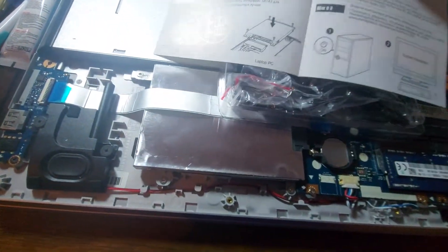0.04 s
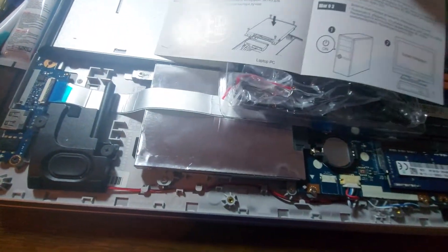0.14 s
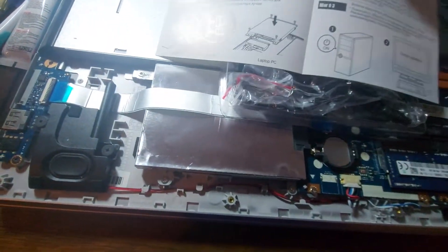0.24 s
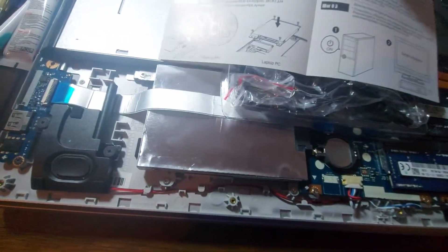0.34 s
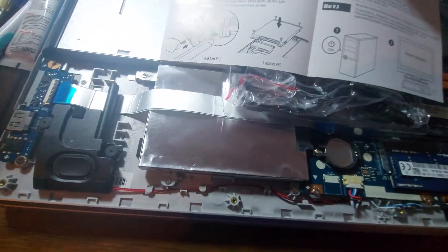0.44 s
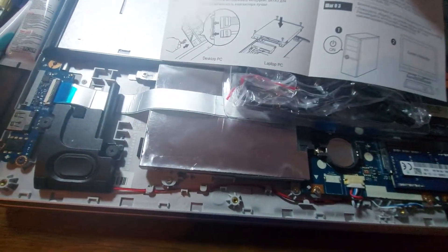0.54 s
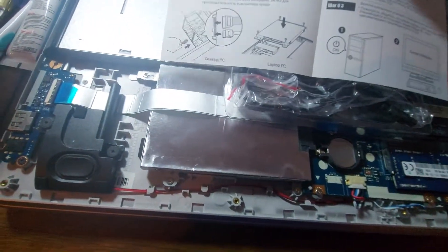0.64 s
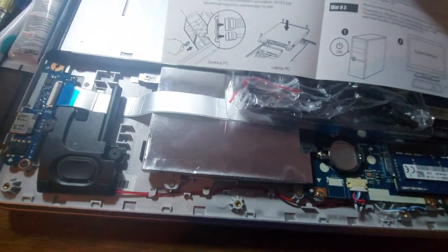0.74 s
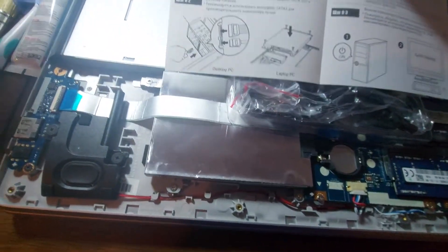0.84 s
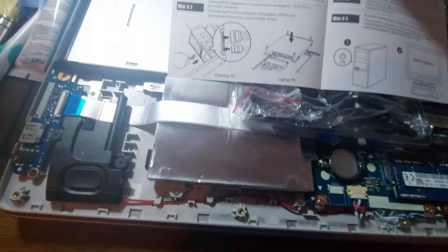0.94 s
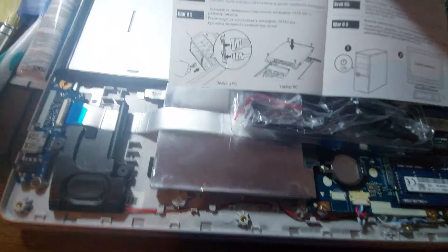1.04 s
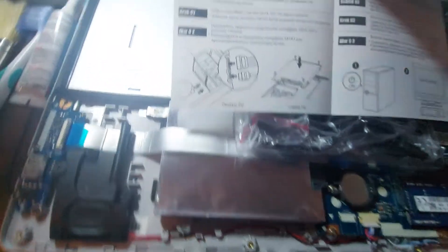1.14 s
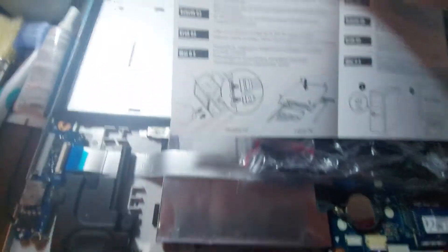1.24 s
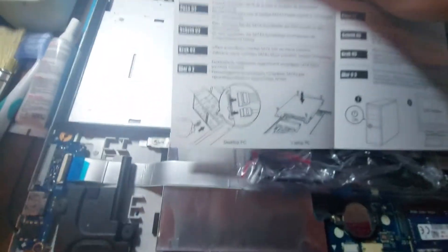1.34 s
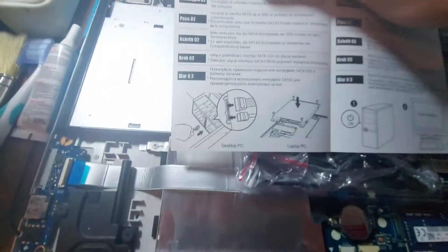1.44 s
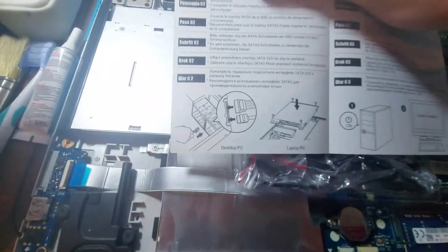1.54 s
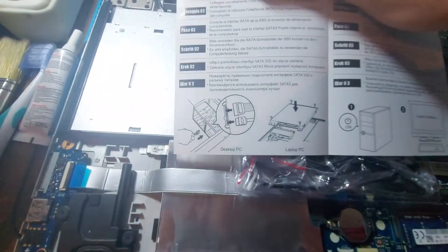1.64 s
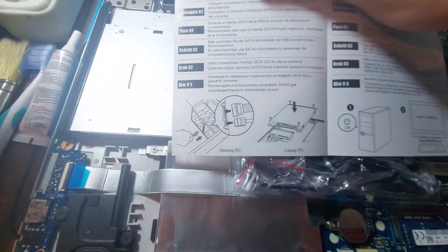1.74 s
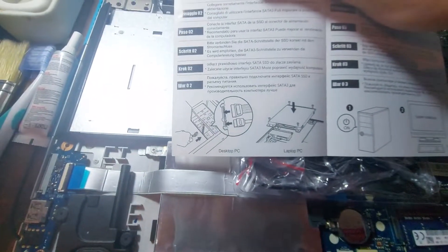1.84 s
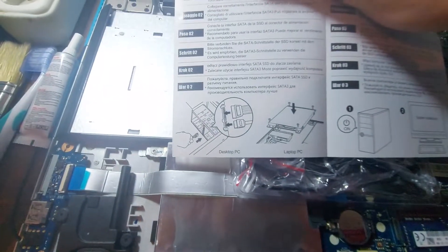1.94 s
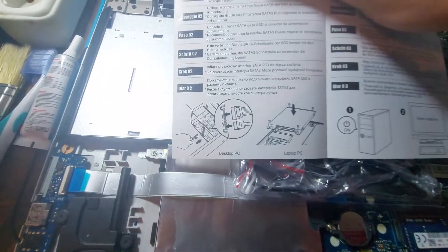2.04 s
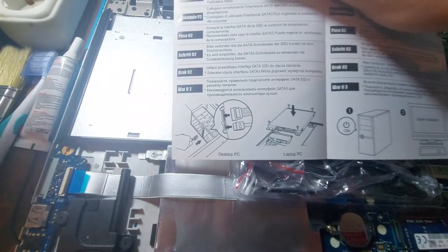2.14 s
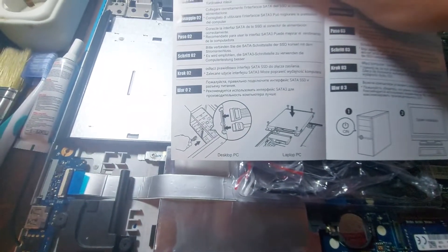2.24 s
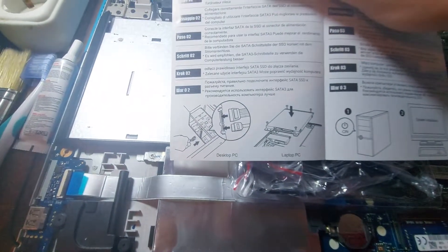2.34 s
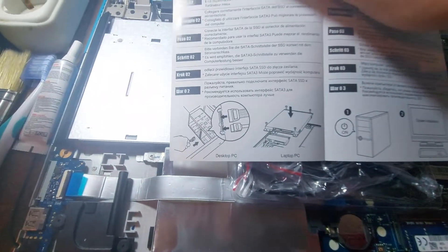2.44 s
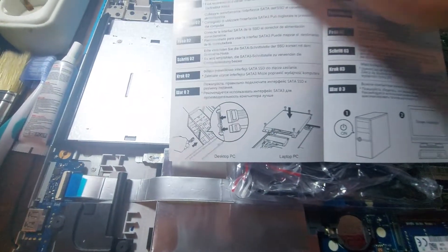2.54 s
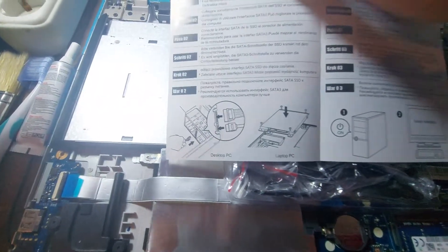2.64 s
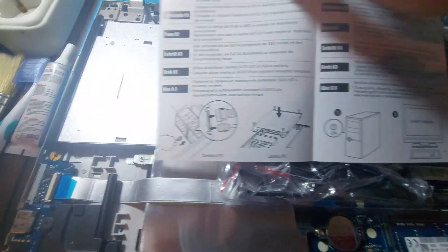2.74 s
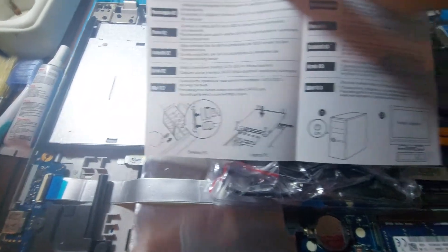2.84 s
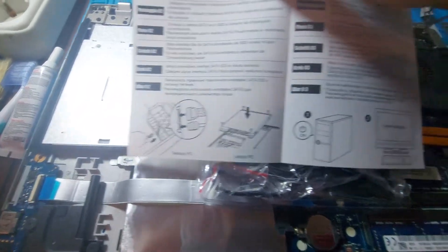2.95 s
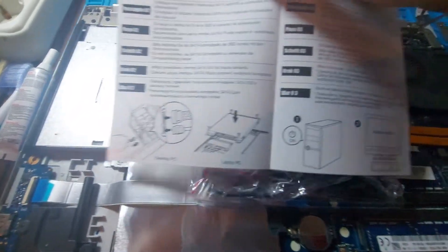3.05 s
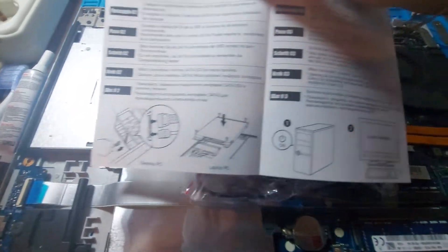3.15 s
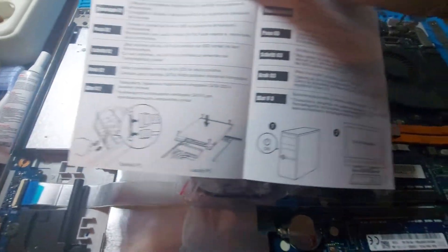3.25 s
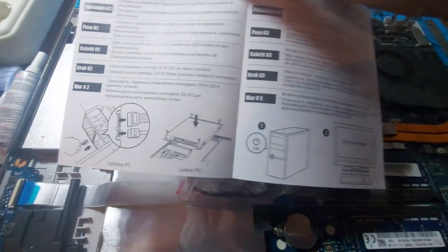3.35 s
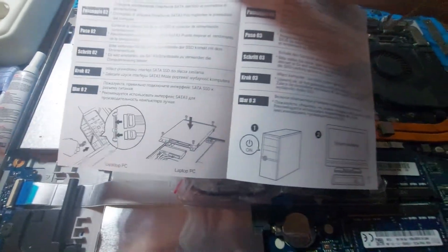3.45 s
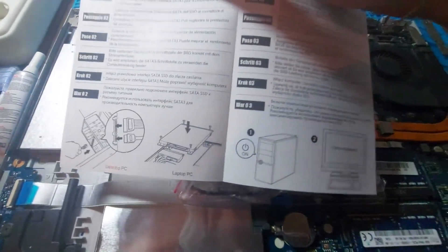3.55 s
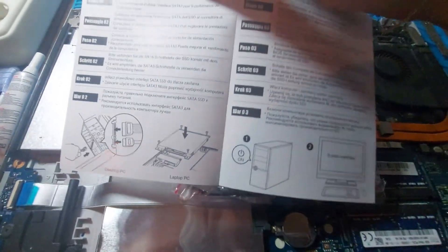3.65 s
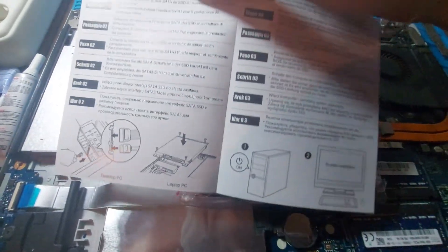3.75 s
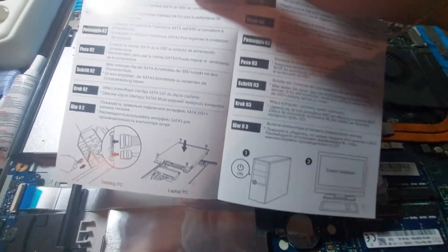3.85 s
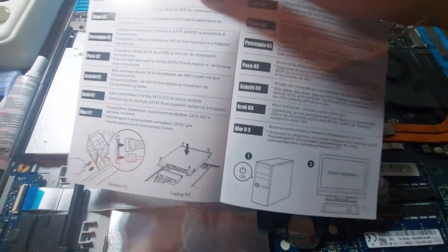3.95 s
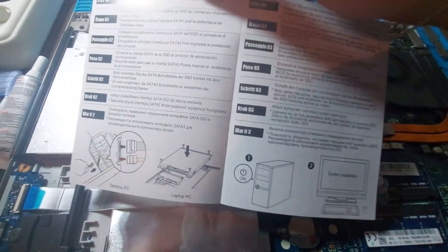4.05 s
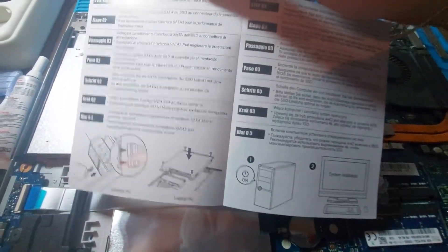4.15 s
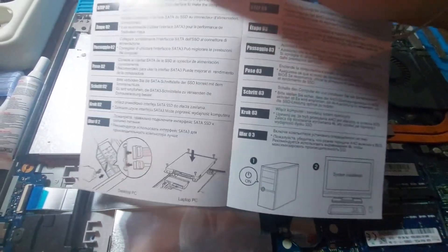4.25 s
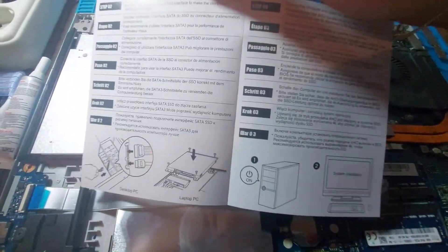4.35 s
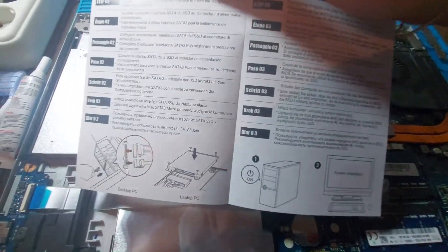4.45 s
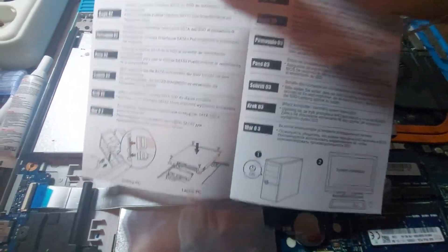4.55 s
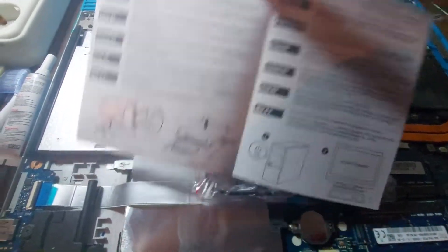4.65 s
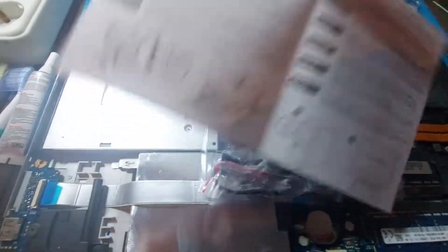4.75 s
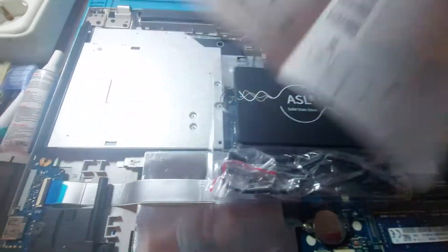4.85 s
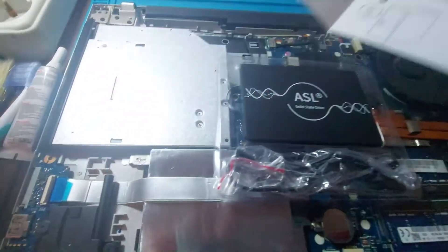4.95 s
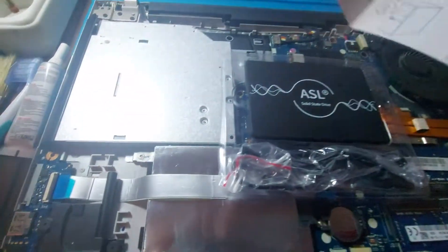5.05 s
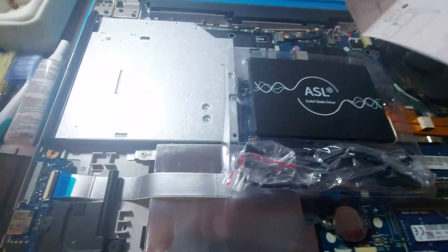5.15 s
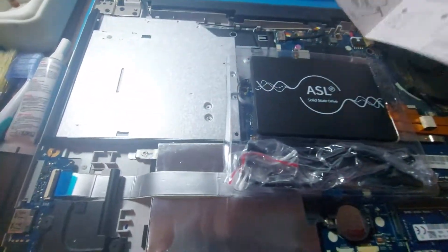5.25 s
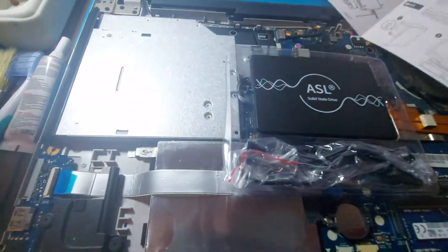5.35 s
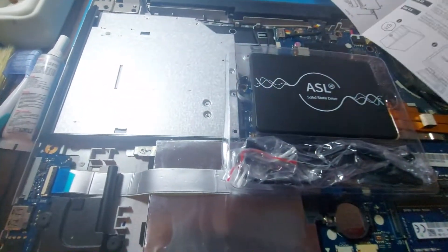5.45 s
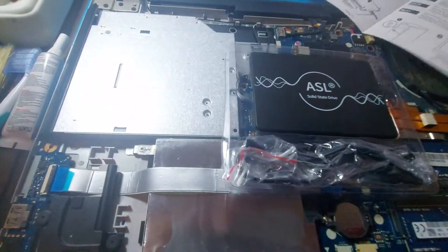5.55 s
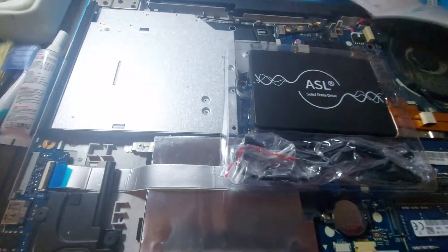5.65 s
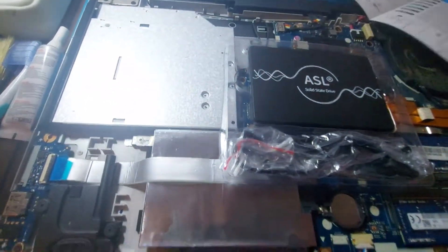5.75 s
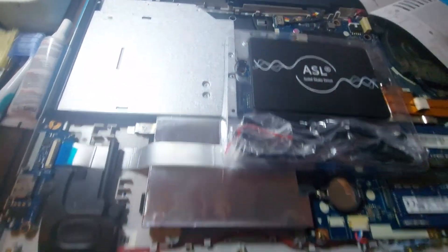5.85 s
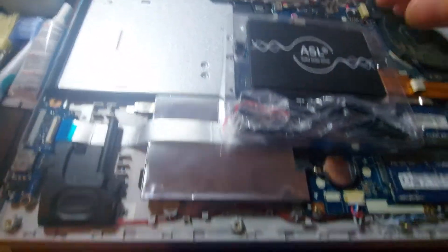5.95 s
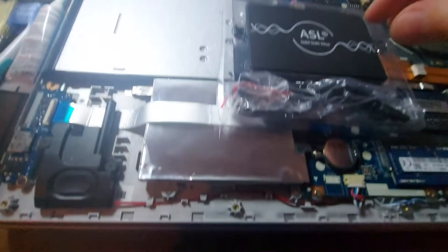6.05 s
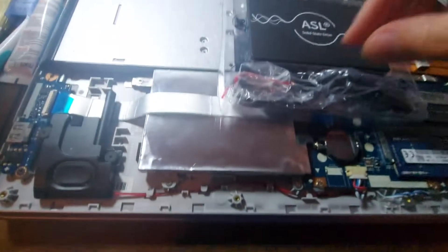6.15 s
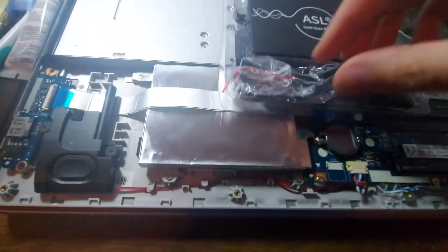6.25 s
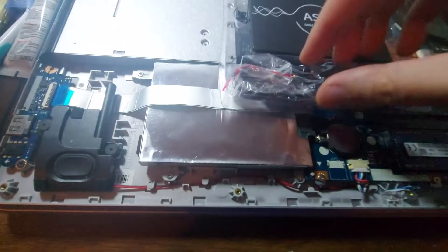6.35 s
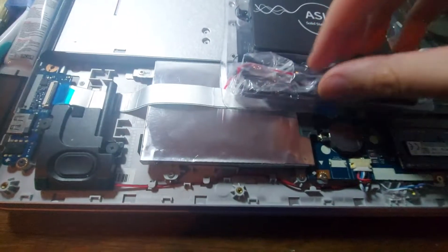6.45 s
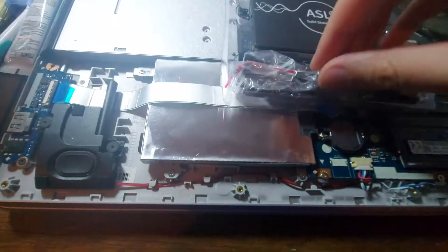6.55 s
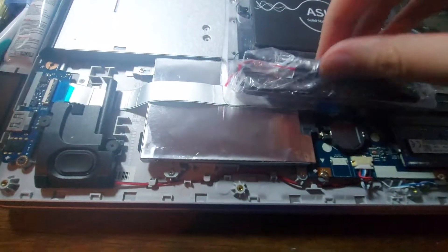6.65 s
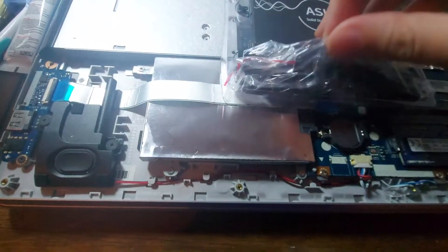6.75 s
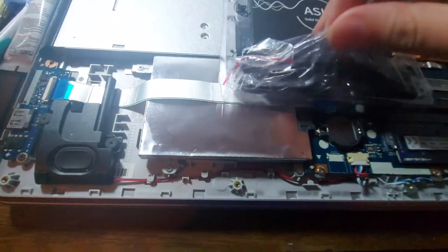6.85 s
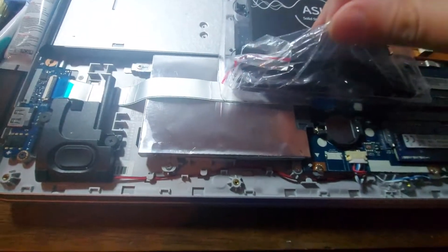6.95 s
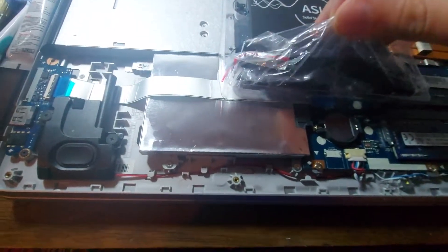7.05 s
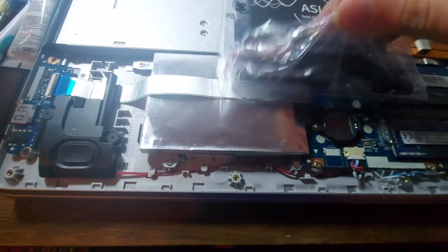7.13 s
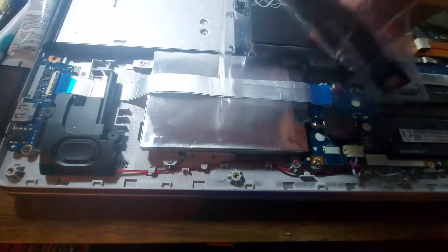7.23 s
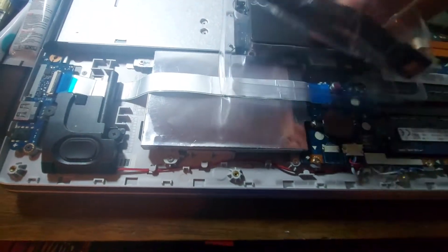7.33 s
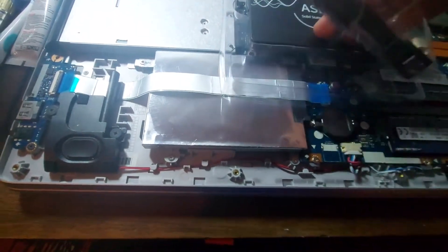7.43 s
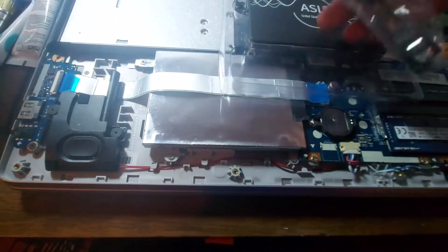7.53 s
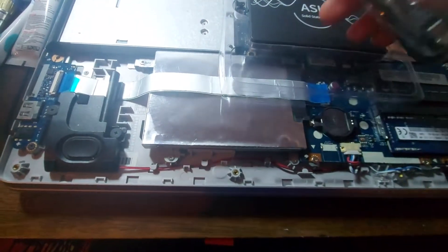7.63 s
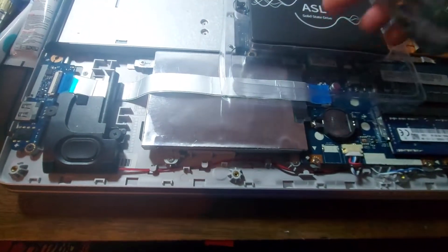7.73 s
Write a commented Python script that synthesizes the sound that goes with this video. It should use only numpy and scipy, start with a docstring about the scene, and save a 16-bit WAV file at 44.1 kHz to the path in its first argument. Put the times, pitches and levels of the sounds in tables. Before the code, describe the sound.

A paper leaflet gives a brief scrape and rustle at the start, close to the microphone, then only faint sliding and a few small ticks. At about 2.8 seconds it flutters and pops softly, and it hisses lightly through the fingers until around 4.3 seconds. From 4.6 to 5.7 seconds the leaflet is swung aside, flapping, scraping and buckling with louder, dull, hollow pops, the strongest near 5.3 seconds. After a little more soft sliding, a thin plastic bag starts crinkling at about 6.5 seconds. Bright snaps and dense bursts of tiny crackles are strongest from 6.7 to 7.3 seconds, with a soft bump against a laptop case near 7.2 seconds. A few lighter crinkles follow until about 7.8 seconds. A faint room hum and low rumble lie underneath throughout.

```python
"""A paper leaflet and a plastic bag

Hands hold a leaflet over an open laptop on a desk, swing it aside, then pick up a thin plastic bag.
The leaflet slides, flutters and buckles with dull pops. The bag crinkles as its creases give way,
in bright snaps and dense bursts of tiny ones. A quiet room hums behind.
The stereo microphone is close, and its left opening sounds hollow."""
import sys
import numpy as np
from scipy import signal
from scipy.fft import rfft, irfft, next_fast_len
from scipy.io import wavfile

SR = 44100
rng = np.random.default_rng(int(sys.argv[2]) if len(sys.argv) > 2 else 0)


def to_wav(sig):
    """Store sig (one row per channel, or 1-D mono) as 16-bit WAV at the path in sys.argv[1].

    Samples outside -1..1 are clipped; the rate is SR.
    """
    pcm = np.clip(np.atleast_2d(sig), -1, 1) * 32767
    pcm = np.round(pcm).astype(np.int16)
    wavfile.write(sys.argv[1], SR, pcm.T)  # frames by channels


N = 343539
TIME = np.arange(N) / SR
FFT_SIZE = next_fast_len(N + SR // 2)
HZ = np.maximum(np.arange(FFT_SIZE // 2 + 1) * SR / FFT_SIZE, 1)
SIDES = np.array([[1], [-1]])   # left, right; a "balance" below is left level minus right level


def from_db(db):
    """Turn decibels into a gain to multiply by."""
    return 10 ** (np.asarray(db) / 20)


def unit_power(x):
    """Scale to an average power of 1."""
    return x / np.sqrt(np.mean(x ** 2) + 1e-20)


def unit_energy(x):
    """Scale a short stereo sound to an average energy of 1 a side."""
    return x / np.sqrt(np.sum(x ** 2) / 2)


def curve(points):
    """Join rows of (f/Hz, level/dB) into a gain for every frequency."""
    hz, db = np.transpose(points)
    return from_db(np.interp(np.log(HZ), np.log(hz), db))


def band(points, low_hz, high_hz):
    """One stretch of a tone curve, falling steeply at both ends."""
    return unit_power(curve(points) / np.sqrt((1 + (low_hz / HZ) ** 8) * (1 + (HZ / high_hz) ** 8)))


def colour(x, gain, balance):
    """Filter a sound and share each frequency between left and right."""
    ratio = curve(balance)
    gains = gain * np.sqrt(2 / (1 + ratio ** 2)) * np.stack([ratio, np.ones_like(ratio)])
    # minimum phase: the filter rings after a click, never before it
    cepstrum = irfft(np.log(gains + 1e-5), FFT_SIZE)
    cepstrum[:, 1:FFT_SIZE // 2] *= 2
    cepstrum[:, FFT_SIZE // 2 + 1:] = 0
    return irfft(rfft(x, FFT_SIZE) * np.exp(rfft(cepstrum)), FFT_SIZE)[:, :N]


# How much the two sides differ, against what they share: f/Hz, level/dB
STEREO_WIDTH = [(60, -16), (250, -12.5), (600, -4.5), (1200, -1.5), (2500, 1), (6000, 0), (14000, 2)]


def widen(pair, lag_s=.0001):
    """Two unrelated signals become stereo: alike in the bass, apart in the treble, the left late."""
    mid, side = rfft(pair, FFT_SIZE)
    width = curve(STEREO_WIDTH)
    delay = np.exp(-2j * np.pi * HZ * lag_s * (SIDES > 0))
    return irfft(delay * (mid + SIDES * width * side) / np.sqrt(1 + width ** 2), FFT_SIZE)[:, :N]


def pan(balance_db):
    """Left and right gains that keep the total power."""
    return unit_power(from_db(SIDES * balance_db / 2))


def drift(turns_per_s):
    """A random wander with a typical size of 1."""
    points = rng.standard_normal(4000)
    return unit_power(np.interp(TIME * turns_per_s, np.arange(len(points)), points))


def add(out, start_s, sound):
    """Mix a short sound in at a given time."""
    i = int(start_s * SR)
    out[:, i:i + sound.shape[1]] += sound[:, :N - i]


def ring(x, hz, width_hz):
    """Make a sound ring at one pitch; a narrower width rings longer."""
    r = np.exp(-np.pi * width_hz / SR)
    feed = np.sqrt((1 - r * r) / 2) * np.array([1, 0, -1])
    feedback = [1, -2 * r * np.cos(2 * np.pi * hz / SR), r * r]
    return signal.lfilter(feed, feedback, x + 1e-18)


def crack(scatter_s, scatter_db, desk_s, desk_db, spread):
    """A click, its quick scatter across the sheet and its reflections from desk and laptop."""
    t = np.arange(SR // 25) / SR
    noise = rng.standard_normal((2, 2, len(t)))
    out = np.zeros((2, len(t)))
    out[0, 3] = out[1, 0] = rng.choice([-1, 1])   # the left side hears it a little later
    for (mid, side), decay_s, db in zip(noise, (scatter_s, desk_s), (scatter_db, desk_db)):
        out += from_db(db) * (mid + spread * SIDES * side) * np.exp(-t / decay_s) / np.sqrt(decay_s * SR)
    return unit_energy(out)


def grains(low_hz, high_hz, per_s, cycles, size_db, clump_db, clump_rate, rub_db, count=18):
    """Tiny slips of uneven size, ringing at many pitches, come in clumps over a smooth rub."""
    happens = rng.random(N) < per_s / SR
    sizes = from_db(size_db * np.minimum(rng.exponential(1, N), 3.5))
    slips = happens * sizes * rng.standard_normal((2, N))
    choice = rng.integers(0, count, N)
    pitches = np.minimum(np.geomspace(low_hz, high_hz, count), .4 * SR)
    rings = sum(np.sqrt(hz) * ring(slips * (choice == k), hz, hz / cycles)
                for k, hz in enumerate(pitches))
    rub = from_db(rub_db) * rng.standard_normal((2, N))
    clumps = from_db(clump_db * drift(clump_rate))
    return unit_power(widen((unit_power(rings) + rub) * clumps))


def hand_moves(rows, rise_s, fades_s):
    """Each move swells, holds and dies away; gives one gain over time for each level column."""
    t = np.arange(0, N, 16) / SR
    gains = []
    for layer, fade_s in enumerate(fades_s):
        power = np.zeros(len(t))
        for start, hold, *levels_db in rows:
            rise = np.exp(-(np.minimum(t - start, 0) / rise_s) ** 2)
            fade = np.exp(-np.maximum(t - start - hold, 0) / fade_s)
            power += (from_db(levels_db[layer]) * rise * fade) ** 2
        gains.append(np.interp(TIME, t, np.sqrt(power)))
    return gains


# Tone of the room's noise: f/Hz, relative level/dB
ROOM_TONE = [(25, -12), (45, -9.5), (65, -3.5), (105, -12), (200, 0), (300, -12.5), (400, -7), (600, -11),
             (850, -23), (1700, -17), (3000, -35.5), (7000, -42.5), (11500, -29), (15000, -36.5)]
# Which side the room's noise leans to: f/Hz, balance/dB
ROOM_LEAN = [(60, -3), (400, 0), (900, 2), (1800, 12.5), (3000, 1), (5000, -1), (8000, 0.5), (12000, 4)]
# Narrow hums in the room: f/Hz, width/Hz, level/dB
ROOM_HUMS = [(145.4, 4.6, -64.5), (302.7, 32.3, -64.5), (582.6, 22, -80)]
# Rise and fall of the low rumble, with the swung leaflet's push of air near 2.8 s: t/s, relative level/dB
RUMBLE_LEVELS = [(0.0, -58), (0.69, -65), (0.74, -55.5), (1.41, -69), (1.45, -58), (2.6, -65), (2.82, -49),
                 (2.99, -61), (4.42, -66.5), (4.49, -92), (4.66, -54.5), (6.12, -70), (6.18, -61),
                 (7.1, -63), (7.16, -54.5), (7.79, -62)]


def background(air_db=-67, rumble_trim_db=-1, swell_db=1, waver_db=-0.86):
    """Low room rumble that swells and sinks, with a low thump of air as the leaflet swings near 2.8 s, a few
    wavering hums and a faint microphone hiss."""
    hiss, hum, deep = (widen(rng.standard_normal((2, N)), lag_s=.0003) for _ in range(3))
    air = from_db(air_db) * colour(hiss, unit_power(curve(ROOM_TONE)), ROOM_LEAN)
    peaks = sum(from_db(db) * unit_power(1 / (1 + ((HZ - hz) / width_hz) ** 2))
                for hz, width_hz, db in ROOM_HUMS)
    hums = colour(hum, peaks, ROOM_LEAN) * from_db(waver_db * drift(16))
    rumble_db = np.interp(TIME, *np.transpose(RUMBLE_LEVELS)) + rumble_trim_db + swell_db * drift(6)
    rumble = from_db(rumble_db) * colour(deep, band(ROOM_TONE, 52, 90), ROOM_LEAN)
    return air + hums + rumble


def wall_echo(x, fade_s=0.6, echo_db=-14, dull_hz=3500, gap_s=0.0075):
    """The walls send back a faint wash, duller than the direct sound."""
    t = np.arange(SR // 2) / SR
    noise = widen(rng.standard_normal((2, len(t))))[:, :len(t)]
    tail = unit_energy(noise * from_db(-60 * t / fade_s) * (t > gap_s))
    tail = signal.sosfilt(signal.butter(1, dull_hz, fs=SR, output="sos"), tail)
    return from_db(echo_db) * signal.fftconvolve(x, tail, axes=1)[:, :N]


# The lifted bag bumps the laptop: t/s, energy/dB, f/Hz
CASE_BUMPS = [(7.155, -21, 170), (7.157, -20, 600), (7.192, -18, 290)]


def laptop_bumps(width_hz=80):
    """Soft, short knocks ring in the hollow case."""
    out = np.zeros((2, N))
    for start, db, hz in CASE_BUMPS:
        push = crack(scatter_s=.002, scatter_db=-12, desk_s=.012, desk_db=-10, spread=.3)
        knock = ring(ring(push, hz, width_hz), hz, 2 * width_hz)
        add(out, start, from_db(db) * unit_energy(knock))
    return out


# Tone of fluttering, bending paper: f/Hz, relative level/dB
PAPER_TONE = [(35, -18), (60, 0.5), (139, 1.5), (217, -9.5), (315, 3), (371, -8.5), (767, -8.5),
              (1110, -11), (1580, -5.5), (2710, -10.5), (3420, -6), (3850, -50), (9350, -41), (12400, -68),
              (16000, -39)]
# Tone of the hiss of sliding paper: f/Hz, relative level/dB
HISS_TONE = [(1180, -7), (2000, 9.5), (2300, -3), (2750, -4.5), (3450, -6.5), (4190, -13), (5990, -15.5),
             (9740, -13), (12300, -7.5), (16000, -17)]
# Which side the paper's sound leans to: f/Hz, balance/dB
PAPER_LEAN = [(100, 2.5), (500, -1.5), (1000, 6), (1700, 8.5), (3100, 10.5), (4500, -2.5), (7500, -4.5),
              (12000, 2.5)]
# The leaflet is swung or bent: t/s, hold/s, relative flutter level/dB, relative bending level/dB
LEAFLET_SWINGS = [(0.0, 0.014, -55, -51.5), (0.05, 0.07, -60, -61), (2.803, 0.018, -49.5, -57),
                  (4.615, 0.0081, -48.5, -64), (4.735, 0.014, -46.5, -52.5), (4.845, 0.012, -47.5, -48.5),
                  (4.888, 0.0048, -47, -56), (5.1, 0.044, -46.5, -53), (5.312, 0.046, -46.5, -52.5),
                  (5.672, 0.022, -55, -48)]
# The leaflet slips through the fingers: t/s, hold/s, relative hiss level/dB, relative bending level/dB
LEAFLET_SLIDES = [(0.0, 0.1, -60, -76), (0.24, 0.21, -76, -72), (0.6, 0.16, -76.5, -73),
                  (0.84, 0.02, -69, -71.5), (1.08, 0.33, -86.5, -80.5), (1.68, 0.034, -83, -73),
                  (2.81, 0.037, -65.5, -65), (2.94, 0.075, -72.5, -72), (3.44, 0.015, -71.5, -73),
                  (3.58, 0.21, -69.5, -68), (3.775, 0.034, -61.5, -64.5), (3.85, 0.034, -82, -70),
                  (3.9, 0.23, -89, -76), (4.19, 0.04, -81, -70.5), (4.3, 0.39, -92, -77),
                  (4.63, 0.12, -62, -63.5), (4.85, .014, -58, -71), (4.93, 0.23, -64.5, -63.5),
                  (5.325, 0.035, -59.5, -58), (5.5, 0.18, -71.5, -65), (5.67, 0.039, -66, -58.5),
                  (6.04, 0.23, -75, -66.5), (6.33, 0.077, -70, -66)]


def leaflet_rustle(flutter_trim_db=-1, bend_trim_db=-1):
    """The whole sheet flutters, its fibres crackle as it bends, and it hisses through the fingers."""
    swinging, bending = hand_moves(LEAFLET_SWINGS, rise_s=.011, fades_s=(.028, .028))
    sliding, dragging = hand_moves(LEAFLET_SLIDES, rise_s=.02, fades_s=(.039, .039))
    flutter = swinging * from_db(flutter_trim_db) * widen(rng.standard_normal((2, N)))
    fibres = grains(450, 2800, per_s=1600, cycles=6, size_db=2.5, clump_db=1, clump_rate=120, rub_db=7)
    fibres *= np.hypot(bending, dragging) * from_db(bend_trim_db)
    hiss = grains(2200, 17800, per_s=2500, cycles=4.5, size_db=3.5,
                  clump_db=1.8, clump_rate=64, rub_db=3.5)
    return (colour(flutter, band(PAPER_TONE, 86, 440), PAPER_LEAN)
            + colour(fibres, band(PAPER_TONE, 260, 1800), PAPER_LEAN)
            + colour(sliding * hiss, band(HISS_TONE, 2060, 11800), PAPER_LEAN))


# A paper edge scrapes along a finger or the sheet:
# middle t/s, half length/s, f/Hz, glide/(Hz per s), width/Hz, level/dB
EDGE_SCRAPES = [(0.0, 0.069, 2100, 0, 462, -49), (3, 0.17, 3100, 0, 600, -77.5),
                (3.2, 0.062, 1620, 0, 980, -74), (3.646, 0.058, 2730, 3000, 990, -66),
                (3.714, 0.16, 12000, 2, 2200, -65.5), (3.738, .05, 3170, 6000, 1200, -68.5),
                (3.812, 0.036, 4180, 3000, 600, -69.5), (4.208, .06, 1870, 0, 600, -71),
                (4.668, 0.046, 12400, 0, 2000, -59.5), (4.683, 0.023, 3200, -12000, 500, -61.5),
                (4.961, 0.011, 2050, -5000, 230, -50), (4.974, 0.026, 2040, -5000, 260, -55),
                (4.96, 0.044, 4350, -6000, 400, -69), (4.96, 0.026, 2800, -3000, 220, -66),
                (5.036, 0.064, 1840, -2200, 250, -61), (5.047, 0.041, 7860, 0, 3000, -63),
                (5.68, 0.056, 1586, -2, 80, -48.5)]


def leaflet_scrapes(catch_db=2.5, catches_per_s=150):
    """An edge catches and slips, ringing at a pitch that can glide as the sheet bends."""
    out = np.zeros((2, N))
    friction = widen(rng.standard_normal((2, N))) * unit_power(from_db(catch_db * drift(catches_per_s)))
    for middle, half_s, hz, glide, width_hz, db in EDGE_SCRAPES:
        first, last = max(int((middle - half_s) * SR), 0), int((middle + half_s) * SR)
        t = np.arange(first, last) / SR - middle
        swell = np.cos(np.pi / 2 * t / half_s) ** 2
        tone = unit_power(ring(ring(friction[:, first:last], hz, width_hz), hz, 2 * width_hz))
        gliding = np.real(signal.hilbert(tone) * np.exp(1j * np.pi * glide * t ** 2))
        add(out, first / SR, from_db(db) * swell * gliding)
    return colour(out, np.ones_like(HZ), PAPER_LEAN)


# The stiff sheet's own notes: f/Hz, width/Hz, relative level/dB
SHEET_NOTES = [(500, 90, -4.5), (771.4, 93, 3), (1040, 15, -5.5), (1490, 130, 10), (1815, 60, 7.5),
               (2420, 43, 6.5), (3275, 100, -4), (4530, 83, -5.5)]


def sheet_ring(push, vary_db=3):
    """The whole sheet rings on after a pop, with a new mix of its notes each time."""
    changes_db = vary_db * rng.standard_normal(len(SHEET_NOTES))
    return unit_energy(sum((-1) ** k * from_db(db + changes_db[k]) * ring(push, hz, width_hz)
                           for k, (hz, width_hz, db) in enumerate(SHEET_NOTES)))


# The leaflet buckles: t/s, relative pop level/dB, f/Hz, width/Hz, relative tick level/dB, balance/dB
LEAFLET_BUCKLES = [(0.0779, -29, 1040, 400, -36, 2), (0.5877, -42, 1510, 810, -49, 7),
                   (0.7234, -35, 1590, 800, -46, 18), (0.8399, -31, 1800, 800, -39.5, 7),
                   (1.1067, -40.5, 2100, 900, -55, 6), (1.6815, -41, 1600, 900, -49, 10),
                   (2.7676, -31, 1160, 800, -38, 5), (2.8102, -42, 1130, 800, -49, 10),
                   (2.822, -24, 1490, 800, -39, 6), (2.8455, -34, 1500, 900, -40, 4),
                   (3.4317, -29.5, 3900, 1100, -44, 8), (3.8835, -33, 1040, 600, -55, 12),
                   (3.9452, -37.5, 1340, 806, -46.5, 21), (4.6079, -10.5, 1720, 332, -37, 17),
                   (4.7047, -26, 1370, 800, -29, 10), (4.728, -30, 1350, 800, -30, 11),
                   (4.7394, -17.5, 2200, 500, -45, 6), (4.8338, -24, 1610, 800, -31.5, -8),
                   (4.8588, -16, 2100, 220, -22.5, -6), (4.8858, -17.5, 1110, 450, -47, -4),
                   (4.952, -22, 2050, 200, -33, -4), (4.9715, -36, 2150, 200, -33, -1),
                   (5.0955, -27.5, 735, 600, -53, -4), (5.1131, -22, 880, 450, -49, 1),
                   (5.131, -18.5, 1040, 400, -27.5, -8), (5.3017, -7, 1270, 990, -29.5, 6),
                   (5.305, -13, 1530, 1300, -29, 4), (5.4844, -34.5, 1300, 800, -41.5, -1),
                   (5.51, -28, 1740, 200, -46, 12), (5.6296, -15.5, 1190, 696, -35, 0),
                   (5.639, -11, 1550, 128, -43, 7), (5.6694, -29, 1180, 800, -25, 1),
                   (5.6736, -17.5, 1300, 300, -41, -4), (5.6834, -15, 1190, 500, -48, 5),
                   (5.693, -16.5, 1660, 110, -50, 2), (6.2963, -34.5, 2600, 900, -53, 4),
                   (6.3466, -28, 1880, 900, -54, 24)]


def leaflet_pops(echo_s=0.004, echo_db=-13, sheet_db=-7):
    """A panel flips with a short hollow ring that bounces off the desk; its edge ticks."""
    pops, ticks = np.zeros((2, 2, N))
    for start, db, hz, width_hz, tick_db, balance_db in LEAFLET_BUCKLES:
        push = crack(scatter_s=.002, scatter_db=-1, desk_s=.008, desk_db=-7, spread=.35)
        panel = unit_energy(ring(push, hz, width_hz))
        pop = from_db(db) * pan(balance_db) * unit_energy(panel + from_db(sheet_db) * sheet_ring(push))
        add(pops, start, pop)
        add(pops, start + echo_s, from_db(echo_db) * pop)
        tick = crack(scatter_s=.0017, scatter_db=24, desk_s=.0074, desk_db=-28, spread=.82)
        add(ticks, start, from_db(tick_db) * tick)
    pop_tone = curve([(100, -9), (300, 16.5), (550, 9), (800, 8), (1100, -0.5), (1600, -1),
                      (2500, -7.5), (3500, -3), (5000, -9), (12000, -19.5)])
    pop_lean = [(400, -5), (900, 0), (1700, 1.5), (3000, 7), (5000, -14.5)]   # f/Hz, balance/dB
    return colour(pops, pop_tone, pop_lean) + colour(ticks, band(HISS_TONE, 2230, 15000), PAPER_LEAN)


def patch_ring(click, low_hz, high_hz, cycles, count=3):
    """A few flat patches of plastic ring after a snap, each at its own pitch."""
    pitches = low_hz * (high_hz / low_hz) ** rng.random(count)
    return unit_energy(sum(ring(click, hz, hz / cycles) for hz in pitches))


def crease(decay_s, patch_db):
    """One crease gives way: a sharp crack with a faint ring of the patches beside it."""
    click = crack(scatter_s=decay_s, scatter_db=11, desk_s=.004, desk_db=-1, spread=.95)
    return unit_energy(click + from_db(patch_db) * patch_ring(click, 2800, 8500, cycles=12))


def crackle(per_s, size_db, decay_s, patch_db=-8, count=12):
    """A crowd of small creases gives way at random moments, each with its own size."""
    happens = rng.random(N) < per_s / SR
    sizes = from_db(size_db * np.minimum(rng.exponential(1, N), 2.5))
    clicks = happens * sizes * rng.choice([-1, 1], N)
    choice = rng.integers(0, count, N)   # each click plays one of a few crease sounds
    spectrum = sum(rfft(clicks * (choice == k), FFT_SIZE) * rfft(crease(decay_s, patch_db), FFT_SIZE)
                   for k in range(count))
    return unit_power(irfft(spectrum, FFT_SIZE)[:, :N])


# Tone of the thin plastic film: f/Hz, relative level/dB
BAG_TONE = [(150, -8), (300, 11.5), (480, -4.5), (830, 2.5), (1100, 1), (1500, 1), (1950, 8), (2550, -0.5),
            (3100, -0.5), (4300, -6.5), (6000, -7.5), (9000, -4.5), (12000, 1), (16000, -9)]
# Which side the bag's sound leans to: f/Hz, balance/dB
BAG_LEAN = [(520, -1), (800, 3), (1170, 3), (1800, 6.5), (2750, 6), (4200, -.5), (6400, -6.5), (9800, -3),
            (15000, -1.5)]
# Fingers squeeze the bag: t/s, hold/s, relative crinkle level/dB, relative film level/dB
BAG_SQUEEZES = [(6.47, 0.0096, -46, -61.5), (6.55, 0.063, -56, -62), (6.652, 0.07, -46, -52),
                (6.725, 0.046, -34, -42), (6.785, 0.014, -41, -50), (6.82, 0.015, -43, -48),
                (6.86, 0.083, -48, -52.5), (6.975, 0.067, -46, -49.5), (7.075, 0.06, -47, -51),
                (7.16, 0.012, -33.5, -43.5), (7.185, 0.021, -33, -44), (7.225, 0.067, -54, -53.5),
                (7.465, 0.055, -54, -55), (7.76, .03, -52.5, -64.5)]
# Big creases snap: t/s, relative crack level/dB, relative film level/dB, balance/dB, decay/s
BAG_SNAPS = [(6.48, -26.5, -39, -1, 0.0011), (6.4864, -20, -33.5, 5, 0.0021),
             (6.5033, -13.5, -26, 1, .0014), (6.553, -18.5, -44, -4, .0016), (6.568, -19, -36, 4, .0012),
             (6.5795, -15.5, -33, -3, 0.00084), (6.5996, -21.5, -36, -8, 0.0011),
             (6.608, -21.5, -40, 6, 0.00078), (6.648, -18.5, -44, 10, 0.0022),
             (6.6582, -9.5, -35, 0.5, 0.0015), (6.664, -19, -31, 0, 0.0023), (6.682, -16, -40, -2, 0.00051),
             (6.691, -13.5, -44, -3, 0.0016), (6.7012, -26, -24, 4.5, .001), (6.7222, -16, -11, -2, 0.0022),
             (6.7255, -9, -20.5, -4, 0.0025), (6.7281, -7.5, -15, -4, .0014),
             (6.7442, -9, -18, -2.5, .0014), (6.7478, -10.5, -19, 8, 0.0013),
             (6.7725, -12, -31.5, -3, .0007), (6.781, -16, -32, 4, 0.0016),
             (6.812, -17.5, -35, -10, 0.00081), (6.8202, -15, -19, 7, 0.0034),
             (6.8291, -12, -30, -5.5, 0.0015), (6.835, -22, -36.5, 5, 0.0016),
             (6.8558, -12.5, -25.5, 4.5, 0.0029), (6.8645, -9, -28.5, 2.5, 0.0019),
             (6.8852, -1.5, -23, -5, 0.00046), (6.903, -10.5, -18.5, 7, 0.0025),
             (6.912, -18, -35, -1, 0.0011), (6.9172, -20.5, -41.5, -5, 0.0014),
             (6.935, -22.5, -36, 2, 0.0022), (6.956, -19, -42, 0, .0012), (6.9671, -6.5, -20.5, 11, 0.0036),
             (6.984, -10, -26, 11, .0014), (6.987, -12, -28, -5, 0.00086), (6.995, -17, -23, 3, 0.0029),
             (7.005, -16, -27, -12, 0.00088), (7.0099, -15, -22, 2, .0025), (7.0278, -14, -24, 8, 0.00091),
             (7.0308, -9.5, -22, -2, 0.0013), (7.0383, -16, -17, -10, 0.0018),
             (7.0489, -10.5, -23, 3, .002), (7.054, -10.5, -34, -9, 0.0014),
             (7.0712, -9, -19.5, -3.5, 0.00087), (7.0893, -6.5, -37, 0, 0.00058),
             (7.097, -15.5, -30, 11, .0009), (7.1064, -9.5, -41, 2, 0.0014),
             (7.1123, -7.5, -34, -5, 0.0017), (7.1428, -14, -21.5, 6, 0.0032),
             (7.1541, -0.5, -14.5, -3, .0014), (7.156, -6, -17, 6.5, 0.004),
             (7.1912, -9, -20.5, -1, 0.0008), (7.1977, -5.5, -25, -18, 0.0015),
             (7.2032, -15, -27, -10, 0.00076), (7.212, -12, -34, -10, 0.0021),
             (7.2196, -22, -36, -6, .0012), (7.2341, -12.5, -33, -8, 0.004), (7.243, -14, -42, 2, 0.0024),
             (7.258, -25, -36, -10, .002), (7.273, -24, -38.5, 3, 0.0034),
             (7.289, -13.5, -24.5, -18, 0.0022), (7.294, -16, -36, -3, 0.0014),
             (7.301, -23, -20.5, 0, 0.0032), (7.306, -19.5, -25.5, 1, 0.0023),
             (7.334, -27, -47, -7, 0.0013), (7.4066, -32, -32.5, 6, 0.0022),
             (7.46, -18.5, -21.5, -5, 0.0023), (7.4992, -14, -17, 1, 0.0013),
             (7.5411, -25.5, -17.5, 7, 0.0021), (7.581, -31.5, -54, 0.5, 0.0015),
             (7.7266, -27.5, -47.5, -4, 0.00069), (7.7461, -26.5, -27.5, 2, 0.0011),
             (7.7655, -28.5, -22, -4, .001), (7.7866, -24.5, -23, -14, 0.0012)]


def plastic_bag(body_db=-2.5, crunch_db=-3, small_patch_db=-5, large_patch_db=-14):
    """Big creases snap one by one amid crowds of small ones, and shake the film around them."""
    crinkle, film = hand_moves(BAG_SQUEEZES, rise_s=.008, fades_s=(.011, .018))
    sparse = crackle(per_s=190, size_db=4, decay_s=.0005)
    dense = crackle(per_s=1500, size_db=3, decay_s=.0006)
    force = crinkle / crinkle.max()   # a harder squeeze folds more creases at once
    creases = np.sqrt(1 - force ** 2) * sparse + force * dense
    crunch = grains(1600, 3800, per_s=300, cycles=12, size_db=3, clump_db=2, clump_rate=150, rub_db=-20)
    bright = crinkle * creases + film * from_db(crunch_db) * crunch
    body = grains(330, 2300, per_s=900, cycles=6, size_db=3, clump_db=2.5, clump_rate=200, rub_db=3)
    body *= film * from_db(body_db)
    shakes = np.zeros((2, N))
    for start, crack_db, film_db, balance_db, decay_s in BAG_SNAPS:
        add(bright, start, from_db(crack_db) * pan(balance_db) * crease(decay_s, small_patch_db))
        push = crack(scatter_s=decay_s, scatter_db=0, desk_s=.008, desk_db=-10, spread=.35)
        shake = unit_energy(push + from_db(large_patch_db) * patch_ring(push, 757, 2970, cycles=27))
        add(shakes, start, from_db(film_db) * shake)
    # a single crease is too small to give off bass; only the whole film does
    return (colour(bright, band(BAG_TONE, 1670, SR / 2), BAG_LEAN)
            + colour(shakes, band(BAG_TONE, 450, 1540), BAG_LEAN)
            + colour(body, band(BAG_TONE, 100, 1550), BAG_LEAN))


def scene():
    """Leaflet and bag close to the microphone, in the humming room."""
    handled = leaflet_pops() + leaflet_rustle() + leaflet_scrapes() + plastic_bag() + laptop_bumps()
    return handled + wall_echo(handled) + background()


def record(dry, cutoff_hz=16100):
    """The highest treble is cut off steeply."""
    return signal.sosfilt(signal.ellip(10, .2, 80, cutoff_hz, fs=SR, output="sos"), dry)


dry = scene()
out = record(dry)
to_wav(out)
```